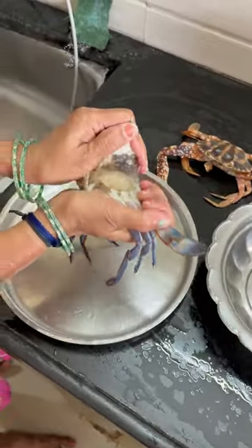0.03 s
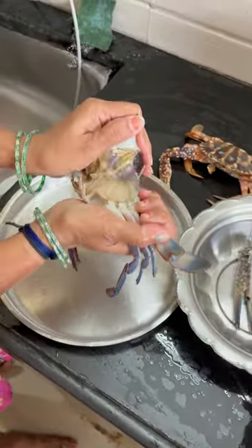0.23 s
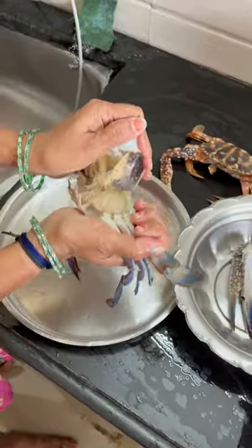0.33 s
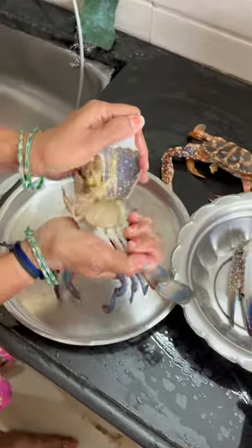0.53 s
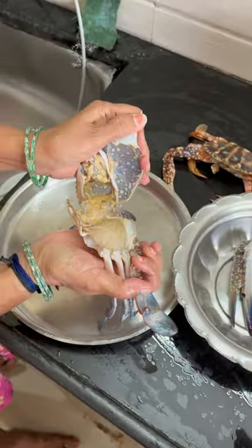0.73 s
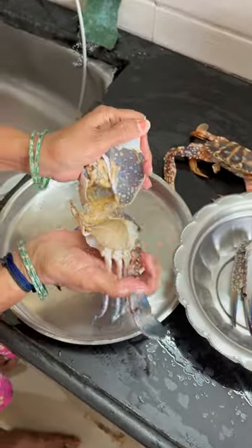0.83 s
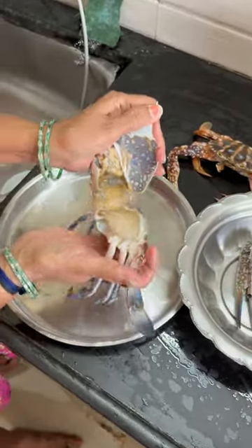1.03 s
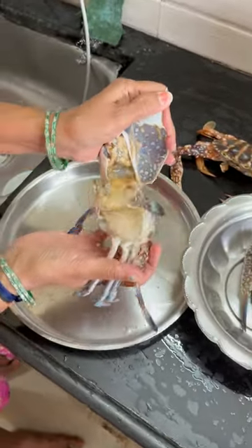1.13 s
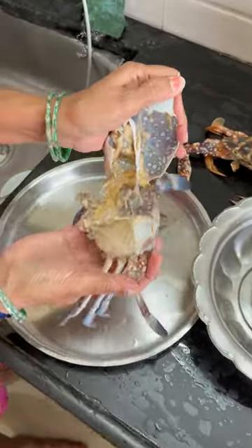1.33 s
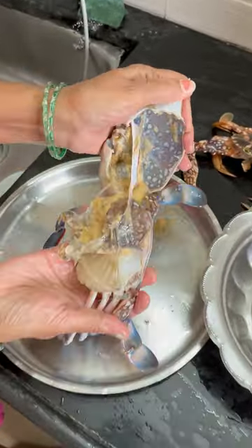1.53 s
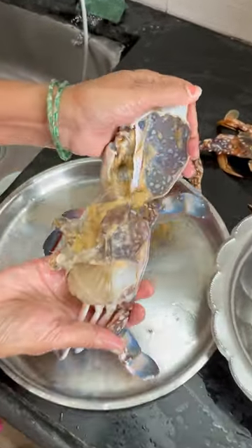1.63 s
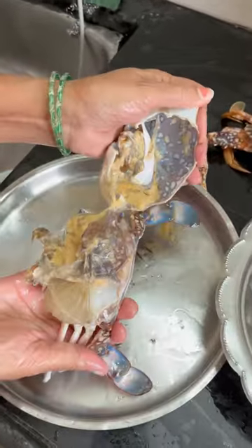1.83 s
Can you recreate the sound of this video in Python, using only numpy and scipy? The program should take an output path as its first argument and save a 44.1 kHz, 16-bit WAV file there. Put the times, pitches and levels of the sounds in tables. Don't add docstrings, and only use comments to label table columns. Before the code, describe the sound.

Close stereo phone pickup of crab shell breaking: soft crackles, a rattling metal knock, a sharp snap just after half a second, then quieter wet ticks and finger rustle, with a short bright room echo and quiet hum.

```python
import sys
import numpy as np
from scipy import signal
from scipy.fft import rfft, irfft
from scipy.io import wavfile
from scipy.ndimage import uniform_filter1d

SR = 44100
rng = np.random.default_rng(int(sys.argv[2]) if len(sys.argv) > 2 else 0)


def dump_mix(stems):
    frames = np.atleast_2d(stems).T
    limited = np.clip(frames, -1, 1)
    pcm = np.round(limited * 32767).astype(np.int16)
    wavfile.write(sys.argv[1], SR, pcm)


def natural_amplitude(level_db):
    exponent = np.asarray(level_db, float) / 20
    return 10 ** exponent


N = 83790
FREQ = np.maximum(np.arange(N // 2 + 1) * SR / N, 1.)


def read(table, hz):
    a = np.array(table, float)
    return np.interp(np.log(hz), np.log(a[:, 0]), a[:, 1])


def level(x, db):
    return x * natural_amplitude(db) / np.sqrt(np.mean(x ** 2))


def colour(x, gain):
    return irfft(rfft(x) * gain, N)


def octave_band(hz):
    return np.maximum(1 - np.abs(np.log2(FREQ / hz)) * 2, 0)


def ring(modes, phase=0., seconds=0.6):
    t = np.arange(int(seconds * SR)) / SR
    m = np.array(modes, float)
    hz, db, t60_s = m[:, :1], m[:, 1:2], np.clip(m[:, 2:3], .001, 1)
    decay = np.exp(-np.log(1000) * t / t60_s)
    return (natural_amplitude(db) * np.sin(2 * np.pi * hz * t + phase) * decay).sum(0)


def soft_start(x, rise_s):
    return x * np.minimum(np.arange(len(x)) / SR / rise_s, 1)


def add(out, x, at_s):
    i = int(at_s * SR)
    out[i:i + len(x)] += x[:len(out) - i]


def walk(rate_hz):
    k = int(SR / rate_hz)
    held = np.repeat(rng.standard_normal(N // k + 1), k)
    return 1.3 * uniform_filter1d(uniform_filter1d(held, k), k)[:N]


def shell():
    # start in seconds, energy level in dB, main resonance in Hz, brightness in dB, length in ms.
    snaps = [(0.062, -34, 3350, 5, 10), (0.113, -37.5, 3070, 22.5, 5), (.128, -33.5, 3550, 16, 3.9),
             (0.128, -39.5, 1500, -2, 2.3), (0.187, -48, 1170, -20, 4.9), (0.2122, -22.5, 3640, 6, 4.5),
             (0.5045, -20, 1720, 7, 2.8), (0.573, -33.5, 2280, -4, 3), (0.5817, -7.5, 2074, 4.5, 1.64),
             (.5822, -7.5, 3200, 2, 1.1), (0.6191, -20, 2110, -0.5, 1.5), (0.6194, -20.5, 1416, -3.5, 1.1),
             (0.637, -23.5, 2270, -8.5, 2.4), (.747, -28, 2490, -8.5, 2.4),
             (.921, -44.5, 2385, -29.5, 0.55), (1.0, -54, 2200, -7.5, 4.1), (1.215, -47, 2240, -17.5, 3.8),
             (1.227, -40, 2200, -30.5, 5.8), (1.245, -39, 1800, 9.5, 6), (1.414, -37.5, 2750, -25, 5.8),
             (1.439, -42.5, 2160, -18.5, 5.2), (1.455, -41.5, 2560, -12, 3), (1.479, -40.5, 2600, -5, 2.5),
             (1.562, -41, 2285, -16, 5.7), (1.6037, -33.5, 2550, -18, 1.3), (1.607, -37.5, 2030, -9, 6.5),
             (1.727, -40.5, 2000, -23, 8.5), (1.779, -37, 1860, -14, 1.6), (1.787, -43, 1770, -21, 1.8),
             (1.802, -30.5, 1810, -28, 0.75), (1.8042, -36.5, 1800, 18, 2), (1.808, -31.5, 2180, -7, 1.6),
             (1.806, -32.5, 3900, -25, 3.5), (1.814, -30, 4140, -6, 2.5)]
    # frequency in Hz, level in dB, t60 in seconds.
    low_modes = [(1120, -21.5, 0.0095), (3020, -9, 0.015), (3200, 1, 0.012), (3690, -4.5, 0.0048),
                 (4400, 4.5, 0.0059), (5144, -2.5, 0.012)]
    top_modes = [(6210, -2.5, 0.0081), (7450, 2, 0.0014), (8070, -13, 0.009), (10400, -10, 0.0055),
                 (10620, -20.5, 0.0052), (11900, -32, 0.0033), (14500, -23, .003)]
    main_t60_s, crisp_db, snap_db = .011, -21, 12.5
    out = np.zeros(N)
    chance = rng.standard_normal((len(snaps), 400))
    t = np.arange(300) / SR
    for (at_s, db, hz, bright_db, ms), c in zip(snaps, chance):
        modes = [(hz, 2, main_t60_s)]
        for k, (f, d, t60_s) in enumerate(low_modes):
            modes.append((f * (1 + .02 * c[k]), d + bright_db + 1.5 * c[10 + k], t60_s))
        for k, (f, d, t60_s) in enumerate(top_modes):
            modes.append((f * (1 + .02 * c[20 + k]), d + 2 * bright_db + 2 * c[30 + k], t60_s))
        tau_s = max(ms, .2) / 1000
        fractures = .05 * c[100:] ** 3 * np.exp(-t / tau_s)
        fractures[30] = 1 if db > crisp_db else .1
        snap = np.convolve(ring(modes, seconds=0.06), fractures)
        snap = signal.lfilter(*signal.butter(1, 600, "high", fs=SR), snap)
        add(out, snap / np.sqrt((snap ** 2).sum()) * natural_amplitude(db + snap_db), at_s)
    return out


def dish():
    # start in seconds, level in dB, contact time in ms.
    knocks = [(0.2191, -34.5, 0.01), (0.2242, -15.5, 0.0091), (0.2247, -10.5, 0.01), (0.2269, -9.5, 0.015),
              (.229, -10.5, 0.017), (0.2304, -12, 0.024), (0.2332, -17, 0.016), (0.2374, -13, 0.03),
              (0.2416, -20.5, 0.052), (0.2498, -19, 0.0077), (0.2604, -11.5, 0.01), (0.2653, -18, 0.037),
              (0.272, -30, .04)]
    # frequency in Hz, level in dB, t60 in seconds.
    strong_modes = [(300, -16, 0.091), (421.8, -3, 0.2), (865, -10, 0.19), (1212, 1.5, 0.11),
                    (1460, -23, 0.93), (1638, 2.5, 0.11), (1683, -8, 0.35), (1981, -13.5, 0.88),
                    (2400, -0.5, 0.5), (2685, -2, 0.25), (3083, -3.5, .3), (3910, -9.5, .3),
                    (3950, -11.5, 0.13), (4230, -2, 0.087)]
    rim_modes = [(195.7, -11.5, 0.048), (300, -8.5, 0.035), (388, -6, 0.12), (481.4, -10.5, .1),
                 (610, -5.5, .05), (714, -19.5, 0.1), (1640, -0.5, 0.036), (1100, 3.5, 0.026),
                 (3505, 2, 0.057), (4650, -10.5, 0.088)]
    # frequency in Hz, level in dB.
    weak_db = [(100, -14), (400, -9.5), (700, -11), (1200, -10.5), (2000, -3.5), (4000, 0), (9500, -9),
               (16000, -22)]
    # frequency in Hz, t60 in seconds.
    weak_t60_s = [(200, 0.33), (1500, 0.23), (4500, 0.11), (9000, 0.045), (15000, 0.26)]
    knock_db, ring_db, ring_start_s, body_s = -31.5, -23, .225, 0.3

    r = rng.random((1100, 4))
    hz = 100 + 15800 * r[:, 0] ** 2
    db = read(weak_db, hz) + 5 * np.log10(hz) + 3 * r[:, 1]
    t60_s = read(weak_t60_s, hz) * (.7 + .5 * r[:, 2])
    crowd = ring(np.c_[hz, db, t60_s], np.pi * np.round(r[:, 3:]), body_s)
    fade = np.cos(np.linspace(0, np.pi / 2, len(crowd)))
    body = level(crowd * fade, 6) + level(ring(rim_modes, seconds=body_s), -1)

    blows, t = np.zeros(N), np.arange(64) / SR
    for k, (at_s, db, ms) in enumerate(knocks):
        push = np.exp(-t / (ms * 0.00063))
        add(blows, (-1) ** k * push / push.sum() * natural_amplitude(db + knock_db), at_s)
    out = signal.fftconvolve(blows, body)[:N]
    strong = ring(strong_modes, 2 * np.pi * r[:len(strong_modes), 3:]) * natural_amplitude(ring_db)
    add(out, soft_start(strong, 0.002), ring_start_s)
    return out


def small_rings():
    # start in seconds, frequency in Hz, level in dB, t60 in seconds.
    taps = [(.002, 2910, -39.5, 0.057), (.004, 1280, -47.5, 0.027), (0.052, 3280, -46, 0.086),
            (.582, 363, -22.5, 0.02), (0.583, 179, -43, 0.12), (.583, 611, -35.5, 0.092),
            (0.701, 300, -45, 0.28), (0.707, 1054, -34, 0.016), (1.568, 11090, -43, 0.082),
            (1.635, 3790, -50.5, 0.28), (1.653, 4746, -41, 0.079), (1.686, 980, -54.5, 0.038),
            (1.866, 4900, -37, 0.037)]
    out = np.zeros(N)
    for at_s, hz, db, t60_s in taps:
        tap = ring([(hz, db, t60_s),
                    (hz * .975, db - 4, t60_s * .6),
                    (hz * .93, db - 8, t60_s * .4),
                    (hz * 1.03, db - 7, t60_s * .4)])
        add(out, soft_start(tap, 0.0034), at_s)
    return out


def rustle():
    # time in seconds, rustle level in dB.
    effort = [(0, -53.5), (0.051, -55.5), (0.093, -62), (0.124, -52.5), (.19, -57), (.3, -88), (0.799, -56),
              (0.931, -75), (1.007, -58.5), (1.098, -76), (1.236, -54), (1.308, -62), (1.371, -76.5),
              (1.45, -64.5), (1.53, -72.5), (1.672, -49), (1.727, -61), (1.8, -52)]
    # frequency in Hz, level in dB.
    spectrum_db = [(1000, -14), (1700, -8), (3000, -3), (4600, -4), (8000, -9), (10300, -16),
                   (13500, -20.5), (16000, -33)]
    grains_per_s, spread_db = 4000, 2
    r = rng.random((3, N))
    hits = (r[0] < grains_per_s / SR) * np.sign(r[1] - .5)
    grains = hits * natural_amplitude(-spread_db * np.log(r[2] + 1e-9))
    grains = level(grains, 0) + rng.standard_normal(N)
    tone = natural_amplitude(read(spectrum_db, FREQ)) * np.minimum(FREQ / 800, 1) ** 6
    out = np.zeros(N)
    for hz in 800 * 2. ** np.arange(0, 4.6, .5):
        out += colour(grains, tone * octave_band(hz)) * natural_amplitude(3.2 * walk(40))
    time_s, effort_db = np.array(effort).T
    return level(out, 0) * natural_amplitude(np.interp(np.arange(N) / SR, time_s, effort_db) + 2 * walk(45))


def room(x):
    # frequency in Hz, t60 in seconds.
    room_t60_s = [(100, 0.57), (400, 0.7), (1500, 0.58), (4000, 0.55), (8000, 0.38), (15000, 0.24)]
    gap_s, rise_s, early_db, early_s = .002, .003, -1.5, 0.034
    t = np.arange(N) / SR
    tails = np.zeros((2, N))
    for hz in 60 * 2. ** np.arange(0, 8.5, .5):
        decay = 1000. ** (-t / read(room_t60_s, hz))
        for tail in tails:
            tail += colour(rng.standard_normal(N), octave_band(hz)) * decay
    tails *= np.clip((t - gap_s) / rise_s, 0, 1)
    tails *= 1 + natural_amplitude(early_db) * np.exp(-t / early_s)
    tails /= np.sqrt((tails ** 2).sum(1, keepdims=True))
    return signal.fftconvolve(tails, x[None], axes=1)[:, :N]


def air():
    # frequency in Hz, level in dB.
    wash_spectrum_db = [(25, -7), (60, -5.5), (200, -11.5), (500, -11), (720, -18.5), (950, -38),
                        (3000, -37), (15000, -47.5)]
    # frequency in Hz, width in Hz, level in dB.
    resonances = [(54, 16, -66), (98.1, 9.8, -62), (131.4, 12, -66.5), (395, 11, -73.5), (487.3, 7, -66),
                  (874, 10, -78.5)]
    fan_hz, fan_db, wash_db = 172.4, -57.5, -57.5

    def one_side():
        wash = colour(rng.standard_normal(N), natural_amplitude(read(wash_spectrum_db, FREQ)))
        out = level(wash, wash_db) * natural_amplitude(0.5 * walk(3.2))
        for hz, width_hz, db in resonances:
            peak = 1 / (1 + ((FREQ - hz) / width_hz * 2) ** 2)
            out += level(colour(rng.standard_normal(N), peak), db)
        return out

    phase = 2 * np.pi * np.cumsum(fan_hz + 3.5 * walk(3.2)) / SR
    fan = np.sin(phase) * natural_amplitude(fan_db + 2 * walk(19))
    return np.array([one_side() + fan, one_side()])


def scene():
    # frequency in Hz, left lead in radians.
    port_phase = [(700, -1.3), (1600, 0), (2600, -2), (4150, -1.7), (4600, 1.3), (16400, 18.1)]
    # frequency in Hz, diffuse share.
    port_spread = [(60, 0.45), (150, 0.31), (300, 0.32), (600, 0.59), (2000, 0.9), (4000, 1), (5400, 0.24),
                   (15000, 0.089)]
    # frequency in Hz, left minus right in dB.
    port_pan_db = [(100, 0), (300, 2), (1200, -2), (2500, -3.5), (5500, -.3), (15000, 0)]
    crack, metal, hands = shell() + small_rings(), dish(), rustle()
    far = room(metal * natural_amplitude(-6.5) + crack * natural_amplitude(-8) + hands * natural_amplitude(-8.5)) + air()
    same = rfft(metal + crack + hands + far[0])
    other = rfft(far[1]) * read(port_spread, FREQ)
    hz, lead_rad = np.array(port_phase).T
    lead_rad = np.interp(FREQ, np.r_[0, hz], np.r_[0, lead_rad])
    turn = np.exp(.5j * lead_rad) * natural_amplitude(read(port_pan_db, FREQ) / 2)
    return np.array([irfft((same + other) * turn, N), irfft((same - other) / turn, N)])


def roll_off(x):
    return signal.sosfilt(signal.butter(12, 16800, fs=SR, output="sos"), x)


def record(dry):
    # frequency in Hz, microphone gain in dB.
    mic_db = [(20, -24.5), (60, -6), (120, -3), (12500, 1.5), (14000, 6.5), (14600, -6.5), (16500, -5.5),
              (16800, -62.5)]
    ceiling = .82
    gain = natural_amplitude(read(mic_db, FREQ))
    mix = np.array([colour(np.clip(c, -ceiling, ceiling), gain) for c in dry])
    return roll_off(mix)


dry = scene()
out = record(dry)
dump_mix(out)
```